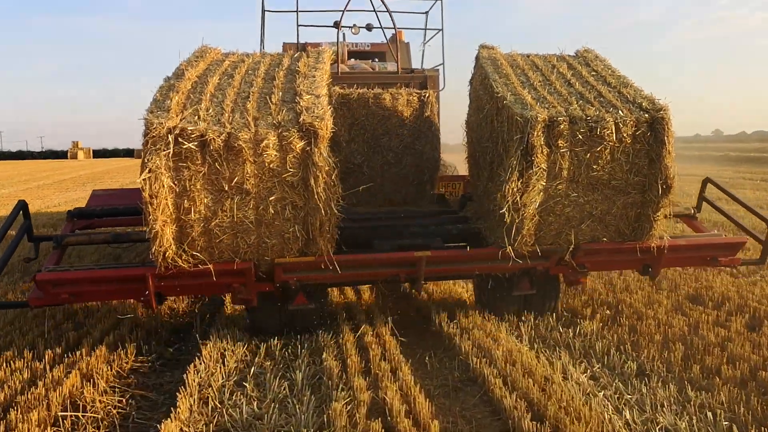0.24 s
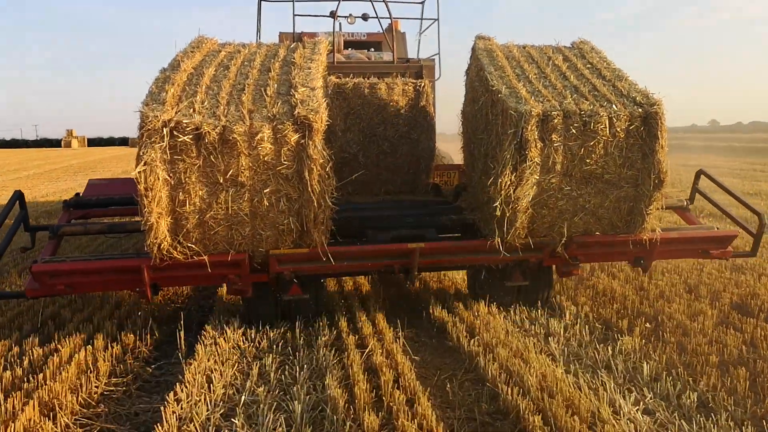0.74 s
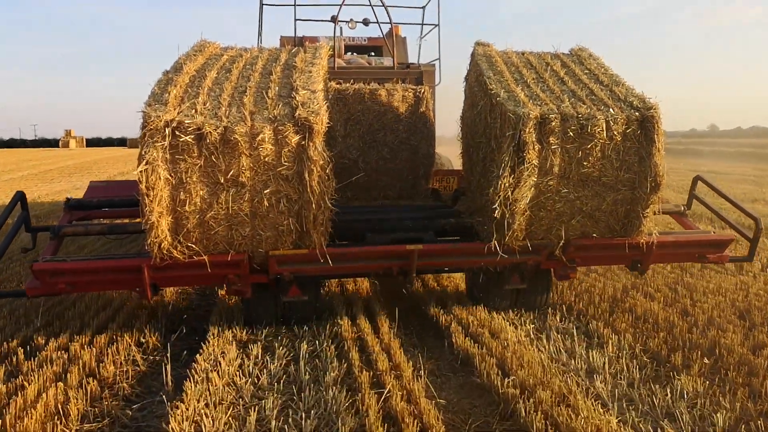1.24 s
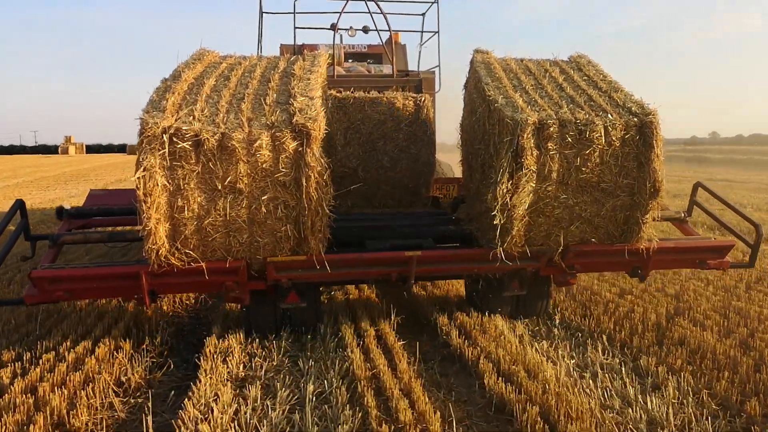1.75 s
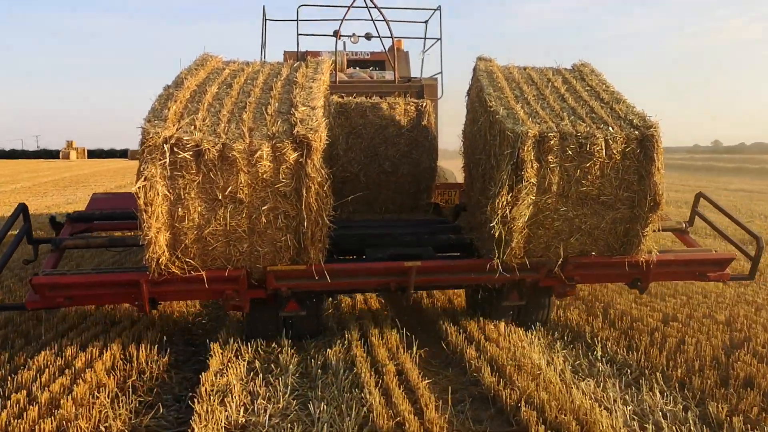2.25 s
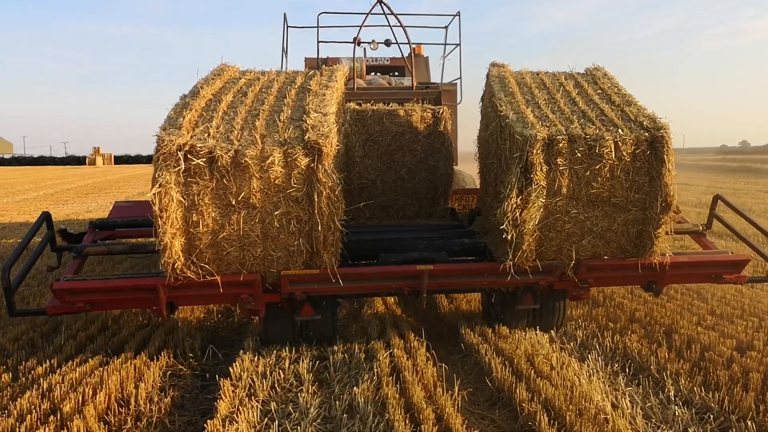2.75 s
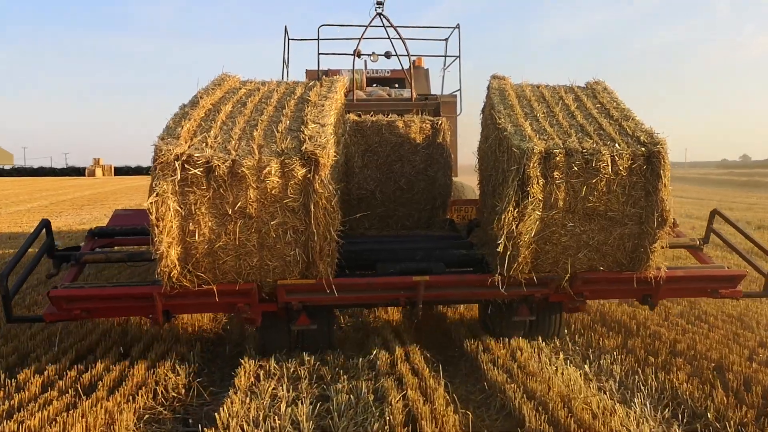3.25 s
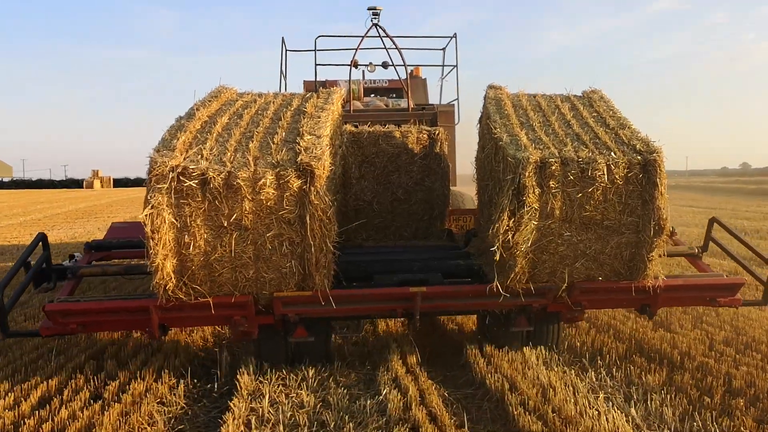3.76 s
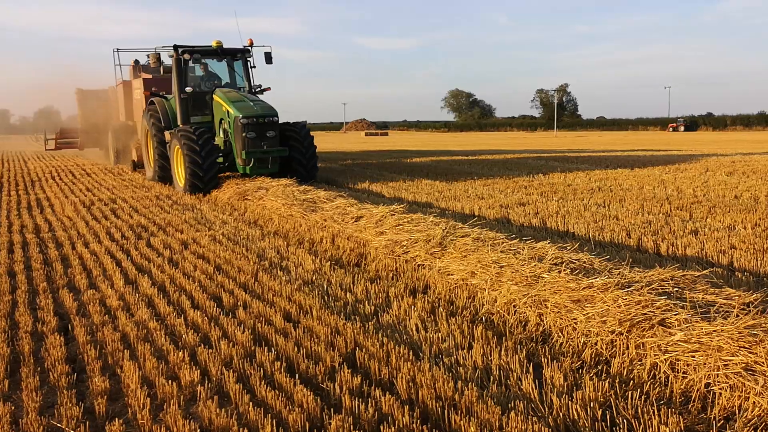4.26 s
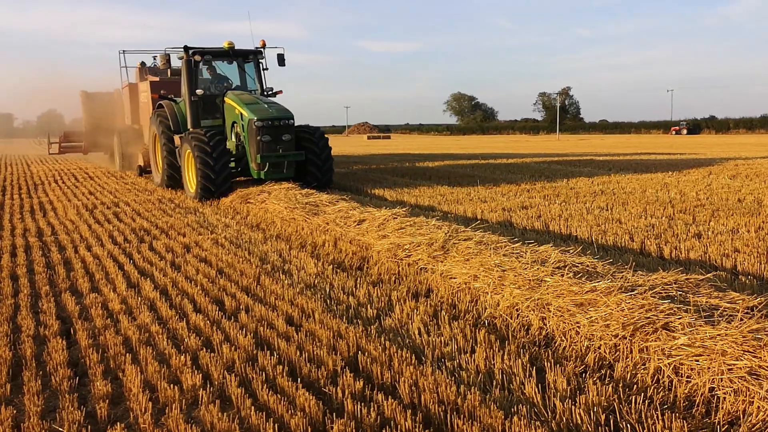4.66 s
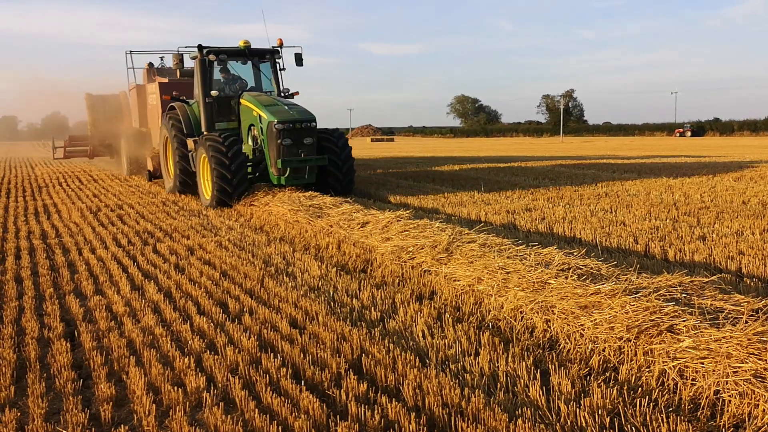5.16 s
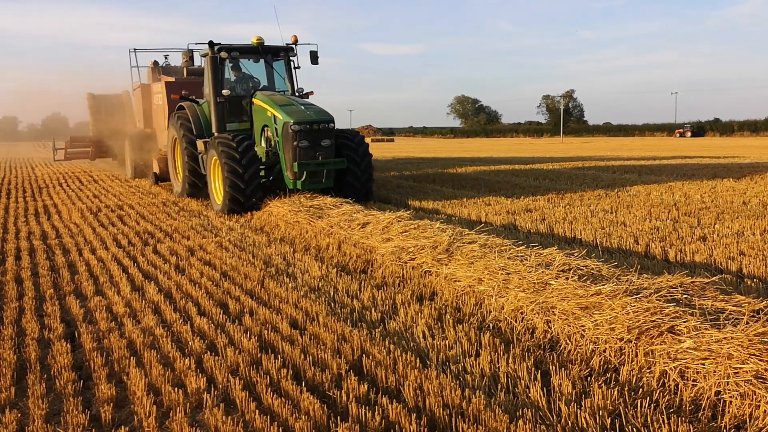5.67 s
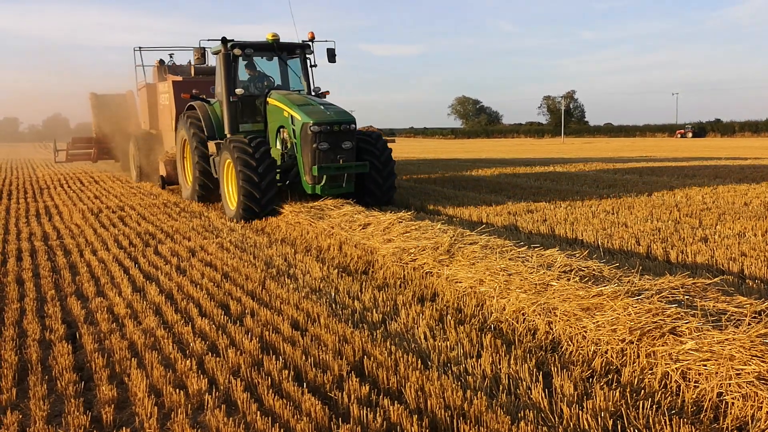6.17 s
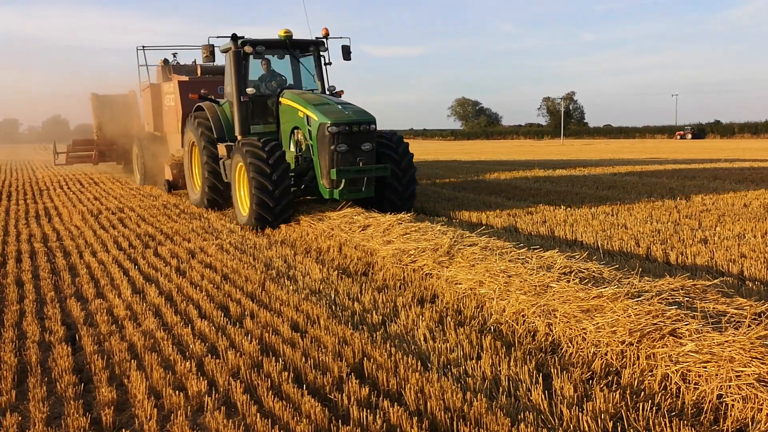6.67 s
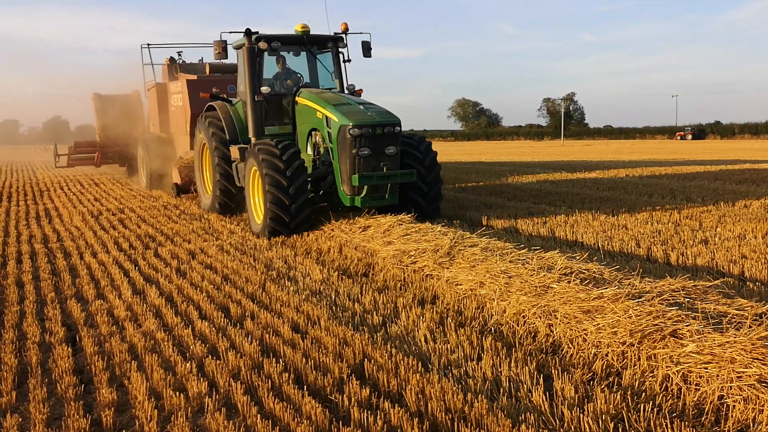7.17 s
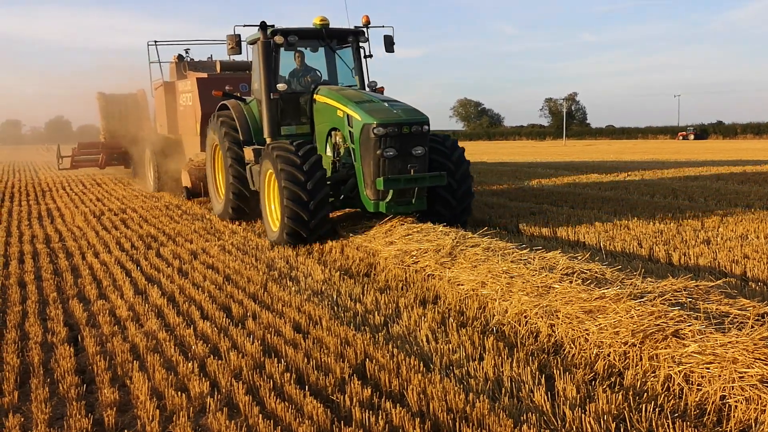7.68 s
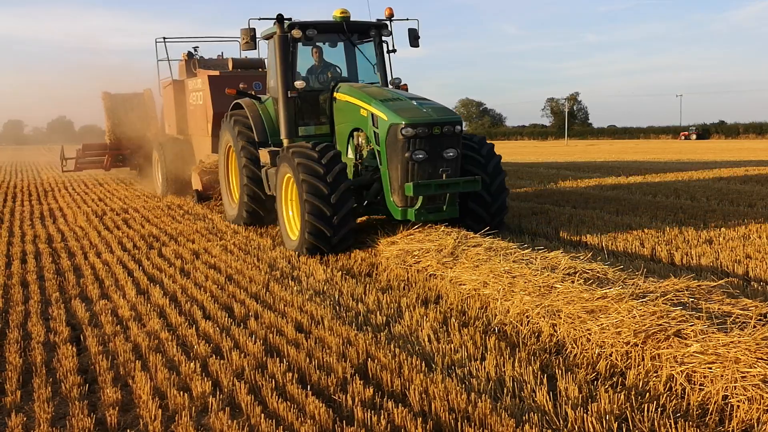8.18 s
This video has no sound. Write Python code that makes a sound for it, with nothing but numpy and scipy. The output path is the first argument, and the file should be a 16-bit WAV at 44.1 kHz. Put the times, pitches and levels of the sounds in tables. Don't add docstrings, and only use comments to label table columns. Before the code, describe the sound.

Close, uneven footsteps crackle in dry straw while machinery drones ahead with a wavering exhaust hum and a short chain whirr. Wind presses on the hand-held microphone in deep flutters. The sound then switches suddenly to a nearer tractor, its rough diesel rumble growing louder, dipping in pitch as the baler plunger loads it, then recovering with whine and throbbing; the wind is calmer.

```python
import sys
import numpy as np
from scipy import signal
from scipy.fft import rfft, irfft, next_fast_len
from scipy.io import wavfile
from scipy.ndimage import uniform_filter1d

SR = 44100
rng = np.random.default_rng(int(sys.argv[2]) if len(sys.argv) > 2 else 0)


def undo_db(level):
    steps = np.asarray(level, float) / 20
    return 10 ** steps


def master(y):
    cut = np.clip(np.atleast_2d(y).T, -1, 1)
    pcm = np.round(cut * 32767)
    wavfile.write(sys.argv[1], SR, pcm.astype(np.int16))


N = 371763
SIZE = next_fast_len(N)
HZ = np.maximum(np.arange(SIZE // 2 + 1) * SR / SIZE, 1)
T = np.arange(N) / SR
CHANGE_S = 4.1225

STROKE_S, STROKE_EVERY_S = 6.37, 2.31
SAG, SAG_IN_S, SAG_OUT_S = .055, .19, .12

# [t/s, f/Hz]
AHEAD_TONE = [
    (0, 158.5),
    (1.0, 158.7),
    (1.78, 149.8),
    (2.3, 164.5),
    (2.9, 169.7),
    (3.5, 163.1),
    (4.03, 149.2),
    (4.12, 155),
]
AHEAD_TONE_DB, DRONE_DB, DRONE_LOAD_DB = -35.5, -46, 3
# [t/s, length/s, level/dB]
CHAIN_RUNS = [
    (2.454, 0.53, -51),
    (4.0, .12, -50),
]
# [f/Hz, level/dB]
FAR_LEFT = [(300, 3.8), (500, -12.7), (800, -19.6), (1150, -16.8), (1750, -12.7), (2300, -17.3),
            (2800, -17.4), (3800, -21.0), (6000, -23.2), (8500, -38.5), (12000, -40.5), (15000, -39.4)]
FAR_RIGHT = [(300, 5.0), (560, -14.4), (750, -7.1), (1150, -14.1), (1750, -0.8), (2300, -8.6), (2800, -3.5),
             (3800, -11.7), (6500, -6.6), (8500, -18.0), (12000, -32.0), (15000, -35.5)]
# [f/Hz, share/1]
FAR_ALIKE = [(300, 0.45), (700, 0.18), (1800, 0.79), (4000, 0.1), (9000, 0.16)]

# [t/s, level/dB]
SWINGS = [(.15, -15.5), (.45, -8), (.9, -9.5), (1.45, -13.5), (1.65, -19.5), (2.05, -9), (2.38, -20),
          (2.62, -12.5), (3.12, -10), (3.65, -14.5), (4.09, -19), (4.4, -28), (5.05, -32), (5.5, -34),
          (6.05, -22), (7.0, -28)]
SWING_S, STILL_DB = 0.12, -34
# [t/s, level/dB]
GUSTS = [(.12, -31), (1.1, -27), (1.3, -27.5), (1.78, -24), (2.4, -30.5), (2.97, -30), (4.04, -24.5),
         (5.95, -33.5), (8.3, -34)]
GUST_S, BREEZE_WALKING_DB, BREEZE_STANDING_DB = 0.072, -31, -37
# [f/Hz, level/dB]
BUFFET_SPECTRUM = [(22, -5.5), (35, -5.5), (60, -11.5), (130, -18.5), (250, -25.5), (320, -34.5),
                   (500, -80)]

# [t/s, length/s, crunch level/dB, rustle rel. level/dB, hollow-stalk ring rel. level/dB]
STEPS = [(0.102, .16, -33.5, -16, -6.5), (0.298, 0.074, -37, -21, -4.5), (0.57, 0.065, -42.5, -20, -12),
         (0.63, .14, -35.5, -17, -6), (1.12, 0.047, -44, -18, -3), (1.202, 0.13, -41, -14.5, -1.5),
         (1.652, 0.19, -33, -22, -5), (1.82, 0.14, -42, -21, -1.5), (2.24, 0.17, -45, -13, -4),
         (2.53, 0.32, -46.5, -28, -2), (2.772, 0.2, -36, -23, -4.5), (3.04, 0.1, -46, -19, -7),
         (3.35, .15, -42, -13, -6.5), (3.55, 0.1, -49, -15, -8), (3.882, 0.14, -32, -25, -13),
         (4.0, 0.16, -42.5, -28, 4)]
# [t/s, length/s, level/dB]
DRAGS = [
    (1.647, 0.055, -27),
    (1.709, .055, -26),
    (1.78, .07, -31),
    (1.86, .08, -47),
    (2.465, .02, -39.5),
    (3.969, 0.067, -28),
    (4.05, 0.066, -32.5),
]
# [t/s, peak level/dB]
SNAPS = [(0.071, -8.5), (0.0902, -42), (0.1096, -29), (0.1971, -6), (0.6005, -30), (0.6392, -11),
         (0.6823, -32), (0.7755, -26), (1.1127, -31), (1.1947, -30), (1.2068, -12), (1.2361, -29),
         (1.642, -15), (1.75, -1.5), (2.0158, -31), (2.1301, -22), (2.25, -18), (2.2862, -34),
         (2.4888, -10.5), (2.7916, -27), (2.809, -13), (2.8754, -15), (3.0301, -31), (3.0904, -27),
         (3.3655, -14), (3.4337, -18), (3.8877, -7.5), (3.9359, -26)]
# [f/Hz, level/dB]
STRAW_LEFT = [(600, -12.7), (1150, -12.6), (1800, -6.8), (2400, -11.0), (3800, -10.1), (5800, -8.7),
              (7300, -16.7), (8500, -25.0), (11000, -27.6), (12500, -28.2), (15000, -28.8)]
STRAW_RIGHT = [(600, -8), (1150, -6), (1800, 13), (2400, 1), (3800, -0.5), (5800, 5), (7300, 5.3),
               (8500, -6.5), (11000, -15.5), (12500, -12.5), (15000, -18)]
STRIDE_ATTACK_DB_S, STRIDE_RELEASE_DB_S, DOME_DB = 257, 217, 6.5
DRAG_ATTACK_DB_S = 1200
SCUFF_DB = -7
WEIGHT_DB = -14.5
HOLLOW_HZ, HOLLOW_OCTAVES = 2516, .1

# [t/s, peak level/dB, f/Hz, decay to -60
# dB/s]
KNOCKS = [(1.03, -16, 80, .1), (1.735, -9, 215, .08), (1.81, -16, 260, .06), (2.06, -18, 110, .1),
          (2.2, -20, 250, .15), (4.0235, 8, 100, .035), (4.05, -18, 240, .05), (4.1228, -4, 1750, .014),
          (4.1225, -22, 5200, .004), (5.94, -16, 65, .08), (7.945, -38, 8200, .05)]

# [t/s, clatter level/dB, ninth-order level/dB, third-order level/dB]
ENGINE = [
    (4.12, -32.5, -25, -40),
    (4.7, -32.5, -26.5, -32),
    (5.3, -33, -29.5, -30.5),
    (6.1, -33.5, -22, -30),
    (6.7, -29.5, -21, -29),
    (7.1, -30, -25.5, -34),
    (7.5, -31, -23, -27),
    (8.43, -32, -21.5, -29),
]
FAR_M, NEAR_M = 29.1, 16.46
NINTH_HZ, NINTH_DRIFT_HZ_S = 152.95, -.3
BEAT_HZ, BEAT_S, BEAT_FROM_S, BEAT_DB = 2.9, 7.35, 7.07, 3
CYLINDERS_DB = [5, -5, 1.5, -3, -0.5, -4.5]
# [order of the cam shaft/1, level/dB]
ORDERS = [(1, -55), (6, -41), (7, -43), (10, -46), (18, -47), (20.3, -37.5), (21.3, -40.5), (24.5, -47.5),
          (26.3, -49), (54.6, -47), (65.7, -74), (115.7, -34.5)]
BONNET = (353, 2.6, 13.9)
GROAN_HZ, GROAN_DB, GROAN_IN_S, GROAN_OUT_S, GROAN_IDLE_DB = 191.2, -15, 0.067, 0.033, -42
MESH_ORDER, MESH_DB = 77.15, -52.5
MESH_CASE = (1270, 18, 15)
# [f/Hz, width/Hz, level/dB]
RATTLE = [
    (4060, 520, -17.5),
    (5900, 92, -8),
    (6950, 200, -12.5),
]
# [f/Hz, width/Hz, level/dB, t half way in/s]
WHINES = [
    (2600, 70, -8, 7.2),
    (4620, 150, -10, 6.8),
    (5500, 70, -18, 4.0),
    (7100, 120, -17, 7.4),
    (15150, 120, -40, 7.6),
]
TURBO_HZ, BOOST_HZ, BOOST_LAG_S, BOOST_FADE_S = 9400, 1800, .12, 1.2
# [f/Hz, level/dB]
NEAR_BASS = [(40, -7), (120, 19), (210, 23.5), (300, 14.5), (370, 16.5)]
# [f/Hz, level/dB]
NEAR_LEFT = [(450, 2), (600, 0), (950, -1), (1300, 2), (1700, 10), (1900, 2), (2600, 7), (3200, -6),
             (4000, -10), (4700, -7), (6000, -11), (8200, -28), (11000, -32), (15000, -33)]
NEAR_RIGHT = [(450, 9), (680, 6), (920, 10), (1300, 7), (1600, 19), (1800, 22), (2000, 20), (2600, 7),
              (3250, -4), (4600, 0), (7000, 0), (8600, -9), (12000, -27.5), (15000, -30)]
# [f/Hz, share/1]
NEAR_ALIKE = [(400, .99), (700, .9), (1800, .88), (2600, .75), (5000, .5), (9000, .3)]
# [f/Hz, phase/rad]
LEFT_LEAD = [(0, 0), (690, -1.6), (950, -4.8), (1810, -6.9), (2150, -10.0), (2670, -9.4), (3010, -5.1),
             (3620, -6.0), (5000, -3.8), (5770, -7.9), (9730, -20.6), (12100, -13.4), (15200, 0.8),
             (15900, -1.1)]
# [f/Hz, width/Hz, level/dB]
GROUND_DIPS = [
    (547, 34, -2.5),
    (1437, 71, -13.5),
    (2300, 124, -9.5),
]
# [f/Hz, width/Hz, level/dB]
HOUSING_LEFT = [
    (490, 35, -9),
    (835, 60, -11),
]
# [f/Hz, width/Hz, level/dB]
HOUSING_RIGHT = [
    (605, 38, -14),
]
TOP_HZ = 15350


def curves(table):
    s, *columns = np.transpose(table)
    return [np.interp(T, s, column) for column in columns]


def over_hz(table):
    hz, value = np.transpose(table)
    return np.interp(np.log(HZ), np.log(np.maximum(hz, 1)), value)


def filt(x, gain):
    return irfft(rfft(x, SIZE) * gain, SIZE)[..., :N]


def hump(hz, octaves):
    return np.exp(-.5 * (np.log2(HZ / hz) / octaves) ** 2)


def bell(hz, at, width, db):
    return db * np.exp(-.5 * ((hz - at) / width) ** 2)


def high_pass(hz):
    return 1 - 1 / (1 + (HZ / hz) ** 8)


def unit(x, lo_hz, hi_hz):
    band = rfft(np.atleast_2d(x).mean(axis=0), SIZE)[(HZ > lo_hz) & (HZ < hi_hz)]
    return x / np.sqrt(2 * np.sum(np.abs(band) ** 2) / SIZE / N)


def walk(rate):
    knots = np.arange(0, N / SR + 1, 1 / rate)
    return 1.4 * np.interp(T, knots, rng.standard_normal(len(knots)))


def tone(hz, db, wobble_db=1.0):
    phase = 2 * np.pi * np.cumsum(hz) / SR
    return np.sqrt(2) * undo_db(db + wobble_db * walk(9)) * np.sin(phase)


def narrow(hz, width):
    x = irfft(bell(HZ, hz, width, 1) * np.exp(2j * np.pi * rng.random(len(HZ))), SIZE)[:N]
    return x / x.std()


def panels(depth_db, width_hz):
    k = int(width_hz * SIZE / SR)
    ripple = uniform_filter1d(uniform_filter1d(rng.standard_normal(len(HZ)), k), k)
    return undo_db(depth_db * ripple / ripple.std() * (HZ > 500))


def ports(both, own, left, right, alike, lead=0):
    share = np.clip(over_hz(alike), 0, 1)
    gain = undo_db(over_hz(left))
    common = filt(both, gain * share * np.exp(1j * lead))
    separate = filt(own, gain * np.sqrt(1 - share ** 2))
    return np.array([common + separate, filt(both, undo_db(over_hz(right)))])


def split(x, edges_hz, levels_db):
    steps_up = [1 / (1 + (HZ / hz) ** 8) for hz in edges_hz] + [1]
    bands = zip(levels_db, [0] + steps_up, steps_up)
    return sum(undo_db(db) * filt(x, hi - lo) for db, lo, hi in bands)


def total_db(levels_db, floor_db=-90):
    return 10 * np.log10(undo_db(2 * floor_db) + sum(undo_db(2 * db) for db in levels_db))


def pressed(s, length, db, attack=STRIDE_ATTACK_DB_S):
    middle = np.clip(2 * (T - s) / length - 1, -1, 1)
    ramp = attack * np.maximum(s - T, 0) + STRIDE_RELEASE_DB_S * np.maximum(T - s - length, 0)
    return db - DOME_DB * middle ** 2 - ramp


def swells(rows, width, floor_db):
    return total_db([db - 6 * ((T - s) / width) ** 2 for s, db in rows], floor_db)


def stroke(before, after, late=0):
    age = (T - STROKE_S - late + STROKE_EVERY_S / 2) % STROKE_EVERY_S - STROKE_EVERY_S / 2
    return age / np.where(age < 0, before, after)


def load():
    return np.exp(-.5 * stroke(SAG_IN_S, SAG_OUT_S) ** 2)


def ahead():
    hz, = curves(AHEAD_TONE)
    strain = load()
    air = filt(rng.standard_normal((2, N)), panels(0.95, 40))
    drone = ports(*air, [(150, -25)] + FAR_LEFT, [(150, -12)] + FAR_RIGHT, FAR_ALIKE)
    breath_db = [0.14 * walk(6.5), 0.43 * walk(8.85), 0.74 * walk(5.87) - 2.5,
                 .8 * walk(8.56) - 5.5, 2.3 * walk(4.92) - 1.5, -7]
    drone = split(unit(drone, 500, 8400), (1300, 2120, 3200, 5840, 9400), breath_db)
    whirr_db = total_db([pressed(*run) for run in CHAIN_RUNS])
    whirr = unit(filt(air[0], hump(2890, 0.031)), 500, 9000) * undo_db([[-12], [0]])
    exhaust = tone(hz * (1 + 0.0095 * walk(12)), AHEAD_TONE_DB + 3 * strain, wobble_db=1.5)
    return undo_db(DRONE_DB + DRONE_LOAD_DB * strain) * drone + undo_db(whirr_db) * whirr + exhaust


def wind():
    breeze_db = np.where(T < CHANGE_S, BREEZE_WALKING_DB, BREEZE_STANDING_DB)
    buffet_db = swells(GUSTS, GUST_S, breeze_db)
    sway = tone(11 * (1 + 0.13 * walk(6.3)), swells(SWINGS, SWING_S, STILL_DB), wobble_db=-1.5)
    gusts = rng.standard_normal((2, N)) * undo_db(1.86 * walk(24.957))
    mid, side = filt(gusts, undo_db(over_hz(BUFFET_SPECTRUM)) * (HZ > 22))
    return sway + undo_db(buffet_db) * unit(mid + .12 * side * np.array([[1], [-1]]), 58, 135)


def crackle(rate, spread_db):
    count = int(2 * rate * N / SR)
    out = np.zeros(2 * N)
    size_db = np.minimum(spread_db * rng.exponential(size=count), 12)
    out[rng.integers(0, 2 * N, size=count)] = rng.standard_normal(count) * undo_db(size_db)
    return out.reshape(2, N) / out.std()


def snaps():
    blows = np.zeros((2, N))
    for s, db in SNAPS:
        k = int(s * SR)
        burst = rng.standard_normal((2, 300)) * np.exp(-np.arange(300) / 70)
        blows[:, k:k + 300] += undo_db(db) * burst
    thin = high_pass(2150) - .4 * high_pass(8800) + .3
    return undo_db(-10) * filt(ports(*blows, STRAW_LEFT, STRAW_RIGHT, FAR_ALIKE), thin)


def steps():
    straw_db = total_db([pressed(s, length, db) for s, length, db, *_ in STEPS], -54.5)
    ring_db = total_db([pressed(s, length, db + hollow_db) for s, length, db, _, hollow_db in STEPS], -75)
    ring_db = ring_db - 4.5 + 2.6 * walk(20)
    rustle_db = total_db([pressed(s, length, db + fine_db) for s, length, db, fine_db, _ in STEPS], -71.5)
    heels_db = [pressed(*drag, DRAG_ATTACK_DB_S) for drag in DRAGS]
    scuff_db = total_db([straw_db + SCUFF_DB] + heels_db)
    hollow = 1 + 1.64 * hump(HOLLOW_HZ, HOLLOW_OCTAVES)
    # level, reference band/Hz, resonance
    layers = [(scuff_db + WEIGHT_DB, (450, 1200), 1), (scuff_db, (1400, 2200), 1),
              (ring_db, (2200, 3300), hollow), (straw_db, (3500, 9000), 1), (rustle_db, (9500, 15000), 1)]
    shares = [high_pass(hz) for hz in (380, 1300, 2150, 3300, 8800)] + [0]
    press_db = 1.6 * walk(45)
    crush = 0
    for (db, span, resonance), above, beyond in zip(layers, shares, shares[1:]):
        cracks = crackle(3500, spread_db=5.0) + 0.54 * rng.standard_normal((2, N))
        straw = ports(*(cracks * undo_db(press_db)), STRAW_LEFT, STRAW_RIGHT, FAR_ALIKE)
        crush = crush + undo_db(db) * filt(unit(straw, *span), (above - beyond) * resonance)
    return crush + snaps()


def bumps():
    out = np.zeros((2, N))
    age = T[:SR // 4]
    for s, db, hz, t60 in KNOCKS:
        k = int(s * SR)
        onset = np.tanh(3 * hz * age) ** 2
        ring = undo_db(db - 60 * age / t60) * np.sin(2 * np.pi * hz * age) * onset
        out[:, k:k + len(age)] += ring * np.array([[1 / (1 + hz / 1500)], [1]])
    return out


def nearness():
    return 20 * np.log10(FAR_M / np.interp(T, [CHANGE_S, N / SR], [FAR_M, NEAR_M]))


def cam_speed():
    return (NINTH_HZ + NINTH_DRIFT_HZ_S * (T - CHANGE_S)) * (1 - SAG * load()) / 9


def clatter_level():
    return curves(ENGINE)[0] + nearness() - 1.5 * load()


def groan_level():
    peak_db = GROAN_DB + nearness() - 3.0 - stroke(GROAN_IN_S, GROAN_OUT_S, 0.043) ** 2
    return total_db([peak_db], GROAN_IDLE_DB)


def clatter(lead):
    strain, near_db, clatter_db = load(), nearness(), clatter_level()
    firing = np.cumsum(6 * cam_speed()) / SR
    cycle = firing.astype(int)
    scatter_db = 3.0 * np.clip(rng.standard_normal(N // 300), -2, 2)
    knock_db = np.take(CYLINDERS_DB, cycle % 6) + scatter_db[cycle]
    gate = 2.1 + undo_db(knock_db) * np.exp(-(firing % 1) / 0.29)
    noise = filt(gate * rng.standard_normal((2, N)), panels(1.0, 40))
    noise = ports(*noise, NEAR_BASS + NEAR_LEFT, NEAR_BASS + NEAR_RIGHT, NEAR_ALIKE, lead)
    housings = (HOUSING_LEFT, HOUSING_RIGHT)
    dips = undo_db([sum(bell(HZ, *dip) for dip in GROUND_DIPS + port) for port in housings])
    noise = unit(filt(noise, dips), 1300, 2250)
    rumble_db = -44.5 + 1.1 * near_db + 6.5 * strain - clatter_db
    growl_db = -42.5 + 1.01 * near_db - clatter_db
    hiss_db = -42.5 + 1.1 * near_db + 1.5 * strain - clatter_db
    bands_db = [rumble_db + 6.5 + 1.4 * walk(8), growl_db + 11.5 + 1.0 * walk(9),
                0.5 * walk(14), hiss_db + 11.0 + .5 * walk(25)]
    return undo_db(clatter_db) * split(noise, (600, 1420, 2330), bands_db)


def exhaust_orders():
    strain, cam_hz = load(), cam_speed()
    _, ninth_db, third_db = curves(ENGINE)
    throb = np.cos(2 * np.pi * BEAT_HZ * (T - BEAT_S)) / (1 + np.exp((BEAT_FROM_S - T) / .15))
    lines = tone(9 * cam_hz, ninth_db - 3 * strain + BEAT_DB * throb, wobble_db=0.84)
    lines = lines + tone(3 * cam_hz, third_db - 8 * strain, wobble_db=-1.0)
    base_db = clatter_level() + 27.5
    for order, db in ORDERS:
        hz = order * cam_hz
        lines = lines + tone(hz, db + base_db + bell(hz, *BONNET), wobble_db=1)
    return lines


def groan():
    hz, db = GROAN_HZ * (cam_speed() / 16.05) ** .4, groan_level()
    return tone(hz, db, wobble_db=.5) + tone(2 * hz, 1.2 * db - 7, wobble_db=1)


def gear_mesh():
    hz = MESH_ORDER * cam_speed()
    resonance_db = bell(hz, *MESH_CASE)
    db = MESH_DB + 1.2 * nearness() + resonance_db - 18 * load() ** 2 + 2.4 * walk(6)
    return tone(hz * (1 + .0025 * walk(25)), db + 3, wobble_db=3)


def rattle():
    sheets = sum(undo_db(db) * narrow(hz, width) for hz, width, db in RATTLE)
    return sheets * undo_db(.9 * groan_level() - 16 + 5 * walk(40))


def whines():
    bands = 0
    for hz, width, db, s in WHINES:
        bands = bands + undo_db(db) * narrow(hz, width) / (1 + np.exp((s - T) / .25))
    return undo_db(clatter_level()) * bands


def turbo():
    rise = np.exp(-.5 * stroke(0.22, 1, BOOST_LAG_S) ** 2)
    rise = np.where(stroke(1, 1, BOOST_LAG_S) < 0, rise, 0)
    since_s = (T - STROKE_S - BOOST_LAG_S) % STROKE_EVERY_S
    boost = np.maximum(rise, 1 / (1 + (since_s / BOOST_FADE_S) ** 2))
    hz = (TURBO_HZ + BOOST_HZ * boost) * (1 + .007 * walk(90))
    return tone(hz, -68.5, wobble_db=3) * undo_db([[-3], [0]])


def tractor():
    lead = np.interp(HZ, *np.transpose(LEFT_LEAD))
    lines = exhaust_orders() + groan() + gear_mesh() + rattle() + whines()
    shade_db = over_hz(NEAR_BASS + NEAR_LEFT) - over_hz(NEAR_BASS + NEAR_RIGHT)
    left_lines = filt(lines, undo_db(shade_db) * np.exp(1j * lead))
    return clatter(lead) + np.array([left_lines, lines]) + turbo()


def scene():
    return np.where(T < CHANGE_S, ahead() + steps(), tractor()) + wind() + bumps()


def roll_off(x):
    return signal.sosfilt(signal.butter(12, 16380, fs=SR, output="sos"), x)


def record(dry):
    soft = np.tanh(.6 * dry) / .6
    return roll_off(filt(soft, HZ < TOP_HZ))


dry = scene()
out = record(dry)
master(out)
```